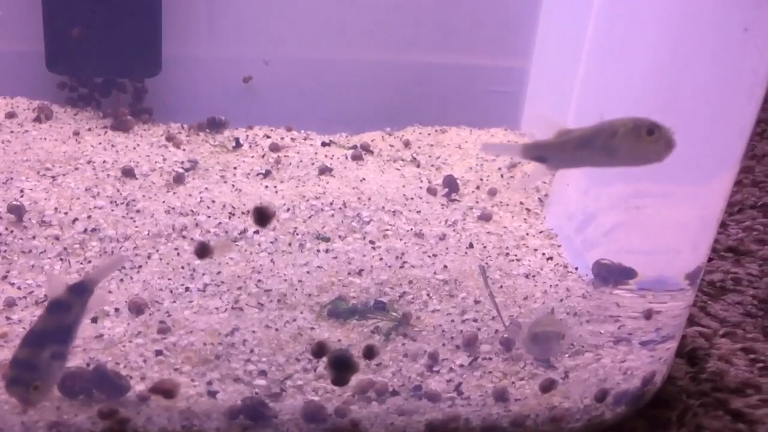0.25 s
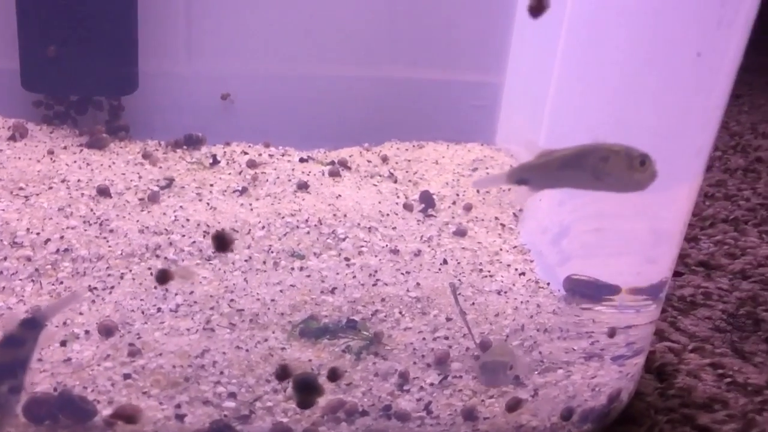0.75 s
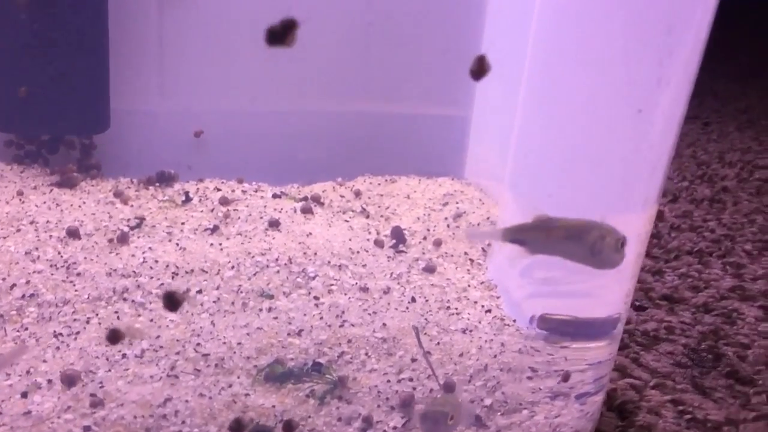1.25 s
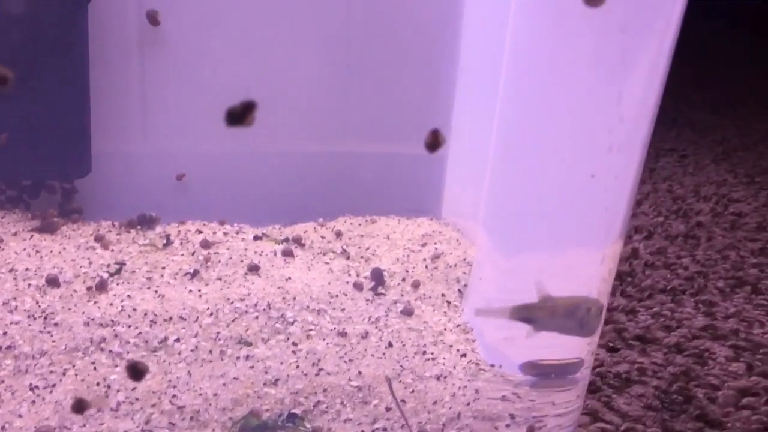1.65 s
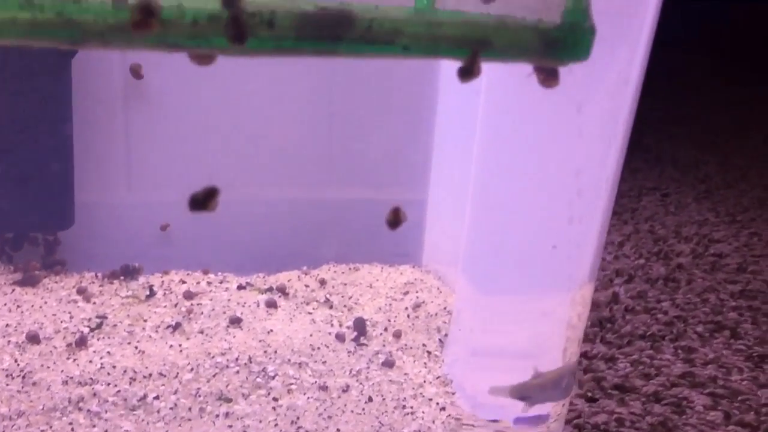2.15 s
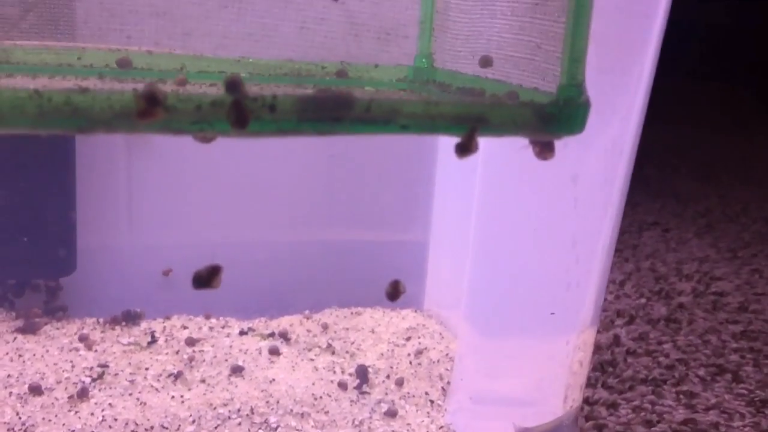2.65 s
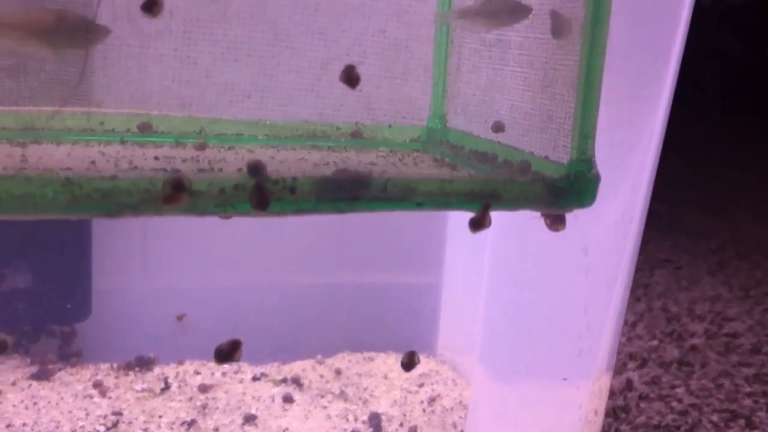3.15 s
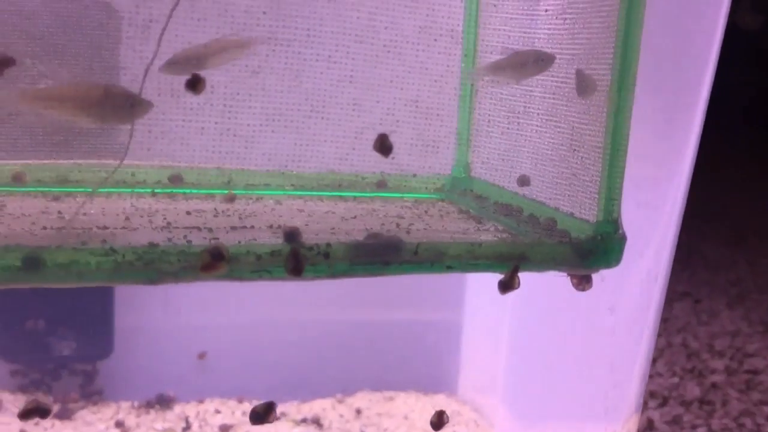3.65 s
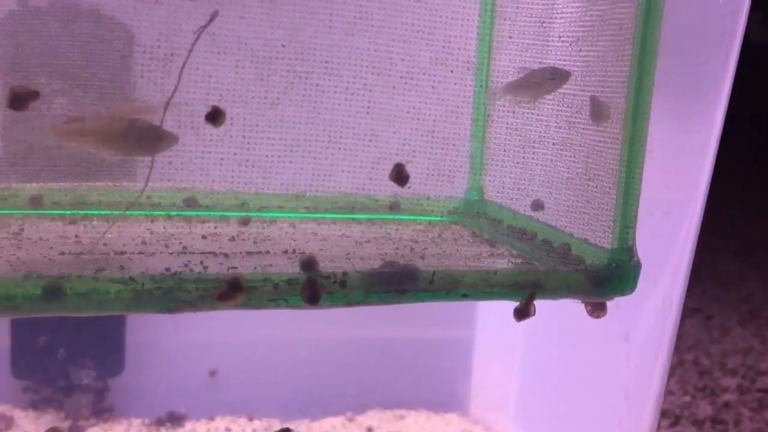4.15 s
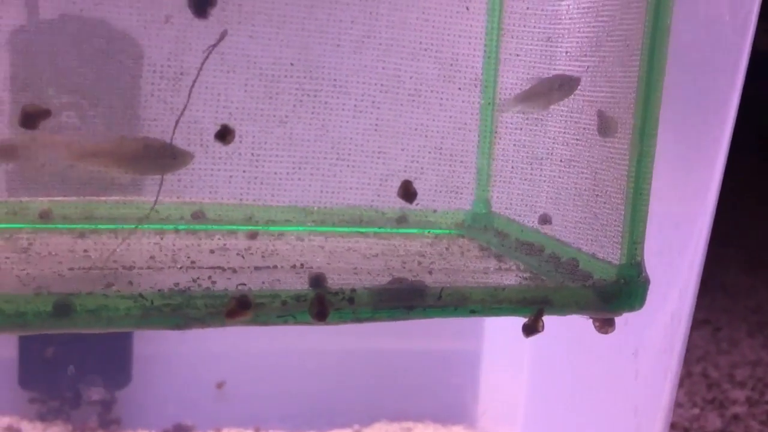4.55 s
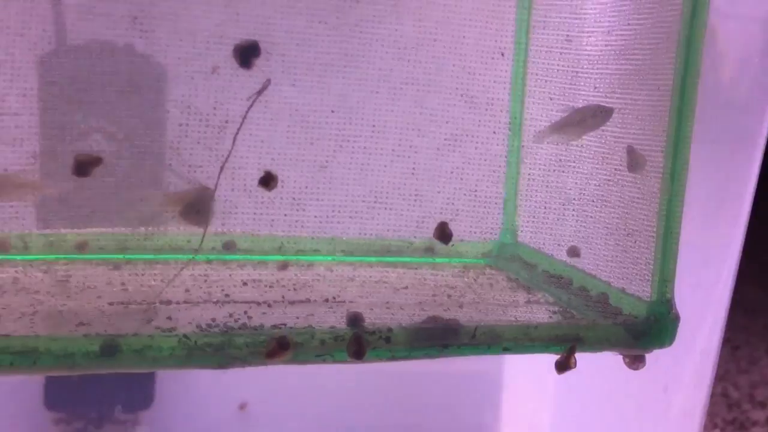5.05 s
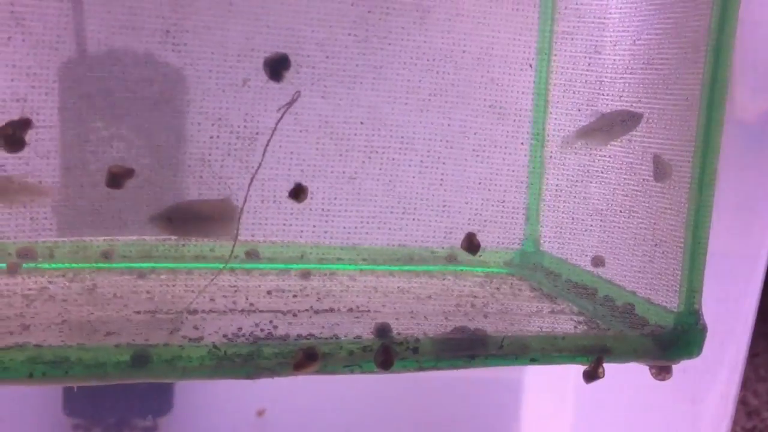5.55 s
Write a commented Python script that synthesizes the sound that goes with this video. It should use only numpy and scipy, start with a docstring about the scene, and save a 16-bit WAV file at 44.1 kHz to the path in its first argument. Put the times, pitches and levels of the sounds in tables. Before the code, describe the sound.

An aquarium filter runs without pause: a steady low hum, a delicate insect-like buzz and a soft noise floor. Over it, swallowed air makes rounded bloops around a middle pitch, with brighter droplets and tiny fizzing bursts. A few dull gulps swell in the first half; sharp loud plops stand out near the middle and later. Mono, close microphone, short hollow tank resonance and a small room echo.

```python
"""A mains-pitch hum and a thin, high buzz run throughout: a small, submerged filter runs in a plastic fish
tank, heard from just beside it in a quiet room. The motor's harmonics make the hum, a tick on every impeller
turn the buzz. The outflow swallows air in round plops, throws little splashes and gulps; each is built of
bubbles that ring down and rise in pitch. They ring in the space above the water and echo briefly in the room;
a dull churning and a steady floor of rumble and hiss lie beneath."""
import sys
import numpy as np
from scipy import signal
from scipy.fft import rfft, irfft
from scipy.io import wavfile
from scipy.ndimage import uniform_filter1d

SR = 44100
rng = np.random.default_rng(int(sys.argv[2]) if len(sys.argv) > 2 else 0)


def output_pcm(signal):
    """Save a mono or channel-first signal as 16-bit PCM at the path in sys.argv[1].

    Samples are clipped to [-1, 1] before scaling.
    """
    pcm = np.clip(np.atleast_2d(signal).T, -1, 1) * 32767
    wavfile.write(sys.argv[1], SR, np.round(pcm).astype(np.int16))


N = 256213  # length in samples
MAINS_HZ = 60.008

# Deep gulps of the outflow. Each row: crest in seconds, level in dB that scales its churning and bubble.
GULPS = [(0.12, -65), (.695, -59), (1.26, -70), (1.88, -59), (2.487, -67)]


def undb(db):
    """Turn decibels into an amplitude factor."""
    return 10 ** (np.asarray(db) / 20)


def level(x, db):
    """Set the rms level of a sound in dB."""
    return x * undb(db) / np.sqrt(np.mean(x ** 2))


def add(track, s, sound):
    """Mix a sound into the track at time s, in seconds."""
    i = max(int(s * SR), 0)
    track[i:i + len(sound)] += sound[:max(N - i, 0)]


def resonate(x, hz, width):
    """One resonance, gain 1 at its centre; width in Hz."""
    return signal.lfilter(*signal.iirpeak(hz, hz / width, fs=SR), x)


def colour(x, points):
    """Shape the spectrum of a noise by (Hz, dB) points."""
    hz, db = np.transpose(points)
    f = np.maximum(np.fft.rfftfreq(len(x), 1 / SR), 1)
    gain = undb(np.interp(np.log(f), np.log(hz), db))
    return irfft(rfft(x) * gain, len(x))


def walk(rate):
    """Smooth random drift, spread near 1; rate in new values a second."""
    k = int(SR / rate)
    steps = np.repeat(rng.standard_normal(N // k + 1), k)
    return 1.3 * uniform_filter1d(uniform_filter1d(steps, k), k)[:N]


def bubble(hz, cycles, swell, rise):
    """A bubble pinches off over a few cycles, rings down and rises in pitch as it nears the surface; peak 1."""
    age = np.arange(int((8 * cycles + 2 * swell) / hz * SR)) * hz / SR  # in cycles
    attack = np.sin(np.pi / 2 * np.minimum(age / swell, 1)) ** 2
    decay = np.exp(-np.maximum(age - swell, 0) / cycles)
    pitch = hz * (1 + rise * np.tanh((age - swell) / cycles / 2))
    return attack * decay * np.sin(2 * np.pi * np.cumsum(pitch) / SR)


def pump():
    """The motor kicks once a mains cycle, giving steady harmonics; a few low casing tones waver beside them."""
    # Harmonics of the hum. Each row: multiple of the mains, rms level in dB.
    harmonics = [(1, -56), (2, -47), (3, -61.5), (4, -68), (5, -88.5), (6, -78), (7, -67), (11, -92),
                 (12, -97.5), (14, -74.5)]
    # Wavering low tones of the casing. Each row: pitch in Hz, rms level in dB about which it wavers.
    casing_tones = [(41.5, -81.5), (161.5, -66.5), (199.7, -64), (212, -78.5)]
    t = np.arange(N) / SR
    out = np.zeros(N)
    for k, db in harmonics:
        sway_db = .35 * walk(4)
        out -= undb(db + sway_db) * np.cos(2 * np.pi * round(k) * MAINS_HZ * t)
    for hz, db in casing_tones:
        waver = undb(db + 4.9 * walk(3.78))
        out += waver * np.sin(2 * np.pi * hz * t + 0.85 * walk(1.99))
    return np.sqrt(2) * out  # peak to rms


def impeller(fall_hz=520, tick_s=0.0047, low_hz=4580, low_db=-12, high_hz=6230, high_db=-9, scrape_db=-7):
    """A light scrape on every turn rings the shaft and falls in pitch: a thin, high buzz."""
    # Ring of the tick over time. Each row: time in seconds, pitch in Hz, level in dB.
    tick_course = [(0, 5730, -79), (1.6, 5640, -79.5), (2.4, 5740, -80), (3.1, 5760, -77.5),
                   (4.4, 5820, -77.5), (5.8, 5860, -79.5)]
    t = np.arange(N) / SR
    s, hz, db = np.transpose(tick_course)
    age = (t - .0036) % (1 / MAINS_HZ)  # seconds into the turn
    env = (age / tick_s) ** 1.4 * np.exp(-.75 * (age / tick_s) ** 2)  # crest near tick_s
    env *= undb(1.2 * walk(50))
    # the pitch falls by fall_hz over twice tick_s
    ring_cycles = (np.interp(t, s, hz) + fall_hz / 2) * age - fall_hz * age ** 2 / (4 * tick_s)
    ring = np.sin(2 * np.pi * ring_cycles + 0.14 * walk(23))
    for side_hz, side_db in ((low_hz, low_db), (high_hz, high_db)):  # weaker modes either side
        ring += undb(side_db) * np.sin(2 * np.pi * side_hz * age + 0.34 * walk(18))
    scrape = level(resonate(rng.standard_normal(N), 5980, 740), scrape_db)
    return level((ring + scrape) * env, 0.4) * undb(np.interp(t, s, db))


def rumble_and_hiss():
    """The steady floor under everything: shaped noise, heaviest in the lows."""
    # Colour of the floor. Each row: frequency in Hz, relative level in dB per Hz.
    floor_colour = [(20, -34), (45, -4.5), (85, -3.5), (140, -4.5), (195, -1), (225, -3), (258, -14.5),
                    (480, -17.5), (640, -22), (1400, -29.5), (3000, -34), (6200, -38), (9500, -43),
                    (15000, -45.5)]
    return level(colour(rng.standard_normal(N), floor_colour), -55)


def churn(count=900):
    """Big, well-damped bubbles tumble under the outflow: a dull wash that swells and ebbs with each gulp."""
    # Colour of the wash. Each row: frequency in Hz, relative level in dB per Hz.
    wash_colour = [(150, 4), (240, 7.5), (340, -15), (500, 8), (620, -11.5), (1200, -22), (2500, -14),
                   (6000, -35.5)]
    rise_s, fall_s, between_db = .05, 0.081, -78  # swell and ebb of a gulp; churning between gulps
    t = np.arange(N) / SR
    tumble = np.zeros(N)
    for s, size, loud in zip(rng.random(count) * N / SR, rng.random(count), rng.standard_normal(count)):
        big = bubble(250 * 2 ** (1.35 * size), cycles=1.7, swell=1.17, rise=0.016)
        add(tumble, s, undb(3.55 * loud) * big)
    wash = level(colour(rng.standard_normal(N), wash_colour), -1.8)
    surge = sum(undb(db) * np.exp(np.minimum((t - s) / rise_s, (s - t) / fall_s)) for s, db in GULPS)
    return (level(tumble, 4.5) + wash) * (undb(between_db) + surge)


def trickle(count=260):
    """Faint bubbles that never stop: round ones, small plips, and a few tiny ones bursting."""
    # Strength of the round bubbles. Each row: time in seconds, level in dB ahead of the tank.
    flow = [(0, -70.5), (2.5, -67), (3.2, -60.5), (5.8, -65.5)]
    out = np.zeros(N)
    for s, size, loud in zip(rng.random(count) * N / SR, *rng.standard_normal((2, count))):
        flow_db = np.interp(s, *np.transpose(flow))
        round_one = bubble(900 * 2 ** (.13 * size), cycles=5.4, swell=6.0, rise=0.063)
        add(out, s, undb(flow_db + 2.8 * loud) * round_one)
    for s, size, loud in zip(rng.random(count) * N / SR, rng.random(count), rng.standard_normal(count)):
        # the smaller the bubble, the rarer and fainter it is
        plip = bubble(min(1600 * 2 ** (2.6 * size ** 2), SR / 3), cycles=7.9, swell=2.0, rise=0.055)
        add(out, s, undb(-69 - 3.7 * size + 3.2 * loud) * plip)
    return out


def plops(count=10):
    """Large air pockets swallowed by the outflow; each sheds a few lesser bubbles as it tears off."""
    # The loudest pockets. Each row: time in seconds, reference level in dB ahead of the tank, pitch in Hz.
    pockets = [(0.087, -42, 964), (0.108, -50, 990), (0.169, -47.5, 1010), (0.581, -46, 980),
               (0.638, -42.5, 958), (0.702, -40.5, 1025), (0.748, -50, 1000), (1.08, -41, 937),
               (1.229, -39, 948), (1.252, -38.5, 957), (1.72, -45, 1020), (1.793, -46, 956),
               (1.852, -36.5, 958), (1.893, -44, 780), (2.145, -48, 837), (2.78, -35.5, 990),
               (2.828, -32, 974), (3.04, -44.5, 853), (3.258, -45, 840), (3.285, -41.5, 920),
               (3.4, -39, 910), (3.506, -39.5, 970), (3.996, -37.5, 850), (4.03, -35, 960),
               (4.378, -43.5, 864), (4.534, -31, 1040), (4.655, -45, 970), (4.956, -37.5, 873),
               (5.155, -39, 1034), (5.335, -42.5, 982), (5.395, -37, 935), (5.479, -50, 857),
               (5.55, -45, 836), (5.603, -36.5, 940)]
    pocket_db, shed_db = -6, -20  # the pocket and each bubble it sheds, relative to the reference
    out = np.zeros(N)
    for (s, db, hz), (length, glide) in zip(pockets, rng.standard_normal((len(pockets), 2))):
        pocket = bubble(hz, cycles=1.83 * np.exp(0.12 * length), swell=6.77, rise=0.018 + 0.025 * glide)
        add(out, s - .004, undb(db + pocket_db) * pocket)
        for wait, size in zip(rng.uniform(-.018, .026, count), rng.standard_normal(count)):
            shed = bubble(hz * 2 ** (0.22 * size), cycles=1.94, swell=3.6, rise=0.048)
            add(out, s + wait, undb(db + shed_db) * shed)
    return out


def splashes(count=38):
    """A leading bubble inside a spray of smaller and larger ones that swells, thins out and leaves fizzing foam."""
    # The loudest splashes. Each row: time in seconds, pitch of the leading bubble in Hz, reference level
    # in dB ahead of the tank, spray in dB relative to that level.
    bursts = [(0.089, 2633, -46.5, -2.5), (0.112, 1675, -50.5, 2), (0.17, 1844, -53, 6),
              (0.448, 1750, -45.5, -20), (.594, 2490, -43.5, 1), (.61, 2880, -49, -14),
              (0.74, 2386, -58.5, 5), (0.934, 1760, -59.5, -6), (1.069, 2400, -64.5, 8),
              (1.125, 2540, -53, -1.5), (1.258, 2220, -62, 6.5), (1.664, 2024, -64, 7),
              (1.81, 1693, -52.5, 6.5), (1.87, 1835, -48, -0.5), (1.932, 1880, -52.5, -20),
              (2.252, 3160, -57, -1), (2.266, 1660, -56.5, -1), (2.344, 3020, -57.5, 3.5),
              (2.37, 1630, -59, 8), (2.384, 3210, -53, -1.5), (2.453, 1680, -52.5, 0.5),
              (2.499, 1668, -51.5, -20), (2.734, 2250, -61.5, 2), (2.781, 1650, -56, 0.5),
              (2.832, 1727, -43.5, -1), (3.018, 2860, -56, 6), (3.238, 2354, -47.5, -0.5),
              (3.379, 2820, -55.5, 5.5), (3.48, 2820, -47, -1.5), (3.485, 1750, -50, -7),
              (3.692, 1744, -54, -5), (3.963, 2700, -58.5, 9), (4.382, 1797, -52, 4.5),
              (4.537, 1235, -45, 1.5), (4.617, 2490, -52, 4.5), (4.685, 2690, -70, 5),
              (4.955, 1147, -47.5, -12), (5.06, 2840, -58.5, 2), (5.154, 1680, -59.5, 2),
              (5.322, 2434, -45, 2.5), (5.348, 2260, -47.5, -8), (5.545, 1924, -51, 0.5),
              (5.706, 2470, -52, -4)]
    droplet_db, spray_s, spray_octaves = -13, .012, 0.335  # each droplet; time scale and pitch spread
    foam_base_db, foam_db_per_octave, foam_lag_s = -22.5, 11.5, 0.0098  # finer splashes leave more foam
    out = np.zeros(N)
    for s, hz, db, spray_db in bursts:
        leader = bubble(hz, cycles=10, swell=0.0052 * hz, rise=0.022)  # swells for 5.2 ms
        add(out, s - .001, undb(db - 3.5) * leader)
        for wait, size, loud in zip(rng.gamma(1.5, spray_s, count), *rng.standard_normal((2, count))):
            drop_hz = min(hz * 2 ** (0.048 + spray_octaves * size), SR / 3)
            droplet = bubble(drop_hz, cycles=6.5, swell=4.5, rise=.05)
            drop_db = db + spray_db + droplet_db + 0.85 * loud - 2 * abs(size)
            add(out, s - .003 + wait, undb(drop_db) * droplet)
        foam_db = db + spray_db + foam_base_db + foam_db_per_octave * np.log2(hz / 2500)
        out += fizz(s + foam_lag_s, 6080, foam_db, octaves=0.368)
    return out


def fizz(s, hz, db, octaves, count=32):
    """A clutch of tiny bubbles bursts within a few hundredths of a second."""
    out = np.zeros(N)
    for wait, size, loud in zip(rng.exponential(0.0092, count), *rng.standard_normal((2, count))):
        pop_hz = min(hz * 2 ** (octaves * size), SR / 2.5)
        pop = bubble(pop_hz, cycles=8.0, swell=1.5, rise=0.032)
        add(out, s + wait, undb(db - 2.5 + 3.6 * loud) * pop)
    return out


def gulp_bubbles():
    """Each gulp lets go one deep, round bubble at its crest."""
    out = np.zeros(N)
    for (s, db), size in zip(GULPS, rng.standard_normal(len(GULPS))):
        deep = bubble(478.5 * 2 ** (0.24 * size), cycles=7.2, swell=2.8, rise=.025)
        add(out, s, undb(db + 8.5) * deep)
    return out


def fizzes():
    """Clutches of like-sized bubbles reach the surface and burst."""
    # Each row: start in seconds, centre pitch in Hz, reference level in dB ahead of the tank.
    clutches = [(.668, 13600, -68), (1.81, 6040, -68.5), (2.268, 4180, -66.5), (3.026, 4420, -59),
                (3.038, 9350, -71), (3.845, 8900, -68), (3.965, 4100, -62), (5.056, 7400, -63),
                (5.343, 4150, -61.5), (5.344, 6500, -63.5), (5.555, 5030, -64)]
    return sum(fizz(s, hz, db, octaves=.11) for s, hz, db in clutches)


def tank(x, null_hz=1390, null_width_hz=330, depth=0.34):
    """Water sounds ring the tank's resonances and lose the band between its two lowest groups."""
    # Ringing of the air space and tank walls. Each row: centre in Hz, width in Hz, relative gain in dB.
    modes = [(835.4, 56, 2.5), (907, 29, -5.5), (988, 72, 3), (1652, 30, 4), (1767, 236, -2.5),
             (2324, 350, -4), (2510, 37, -6.5), (2940, 77, 3.5), (4440, 28, -13)]
    direct = x - depth * resonate(x, null_hz, null_width_hz)
    ringing = sum(undb(db) * resonate(x, hz, width) for hz, width, db in modes)
    return direct + undb(-1.5) * ringing


def room(x, t60, tail_db, early_db, early_s):
    """Quick reflections from the tank and nearby walls, then the short tail of a carpeted room."""
    t = np.arange(SR // 2) / SR
    early = rng.standard_normal(len(t)) ** 3 * np.exp(-t / early_s) * (t > .002)  # cubed: sparse spikes
    tail = colour(rng.standard_normal(len(t)), [(300, 5), (3000, 1), (12000, 2.5)])
    tail *= undb(-60 * t / t60) * (t > .009)
    echo = undb(early_db) * early / np.linalg.norm(early) + undb(tail_db) * tail / np.linalg.norm(tail)
    return x + signal.fftconvolve(x, echo)[:N]


def scene():
    """Water sounds pass through tank and room; churning, pump, impeller and floor are heard directly."""
    bubbles = plops() + gulp_bubbles() + splashes() + fizzes() + trickle()
    water = room(tank(bubbles), t60=0.37, tail_db=-7.0, early_db=-2.5, early_s=0.01)
    return (water + churn() + pump() + impeller() + rumble_and_hiss())[None]


def record(dry):
    """The recorder passes everything up to its treble limit, a steep cut at 15.7 kHz."""
    return signal.sosfilt(signal.ellip(10, .2, 70, 15700, fs=SR, output="sos"), dry)


dry = scene()
out = record(dry)
output_pcm(out)
```